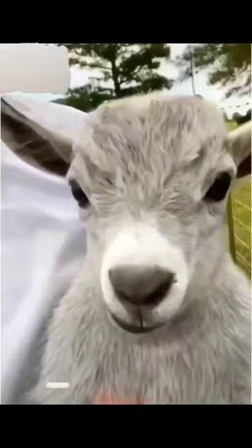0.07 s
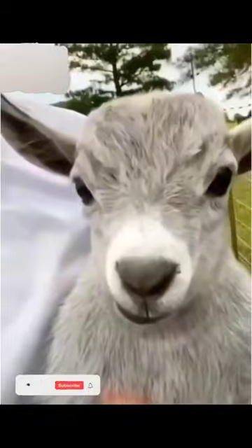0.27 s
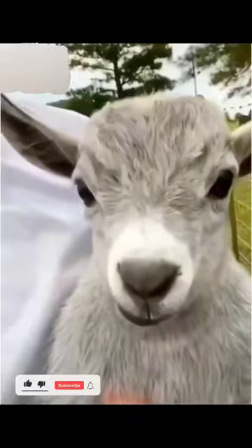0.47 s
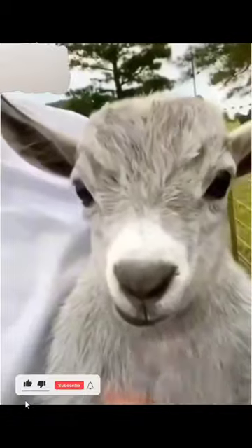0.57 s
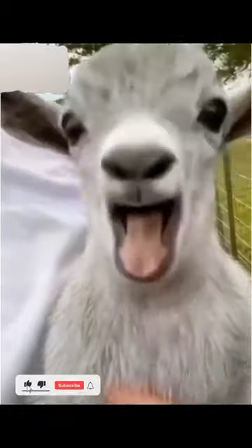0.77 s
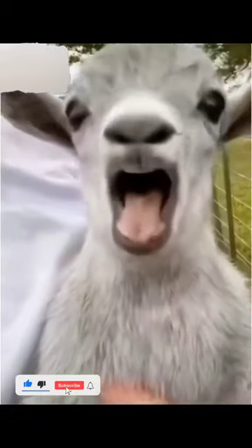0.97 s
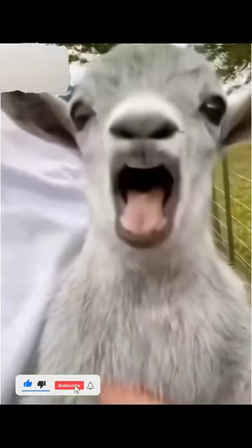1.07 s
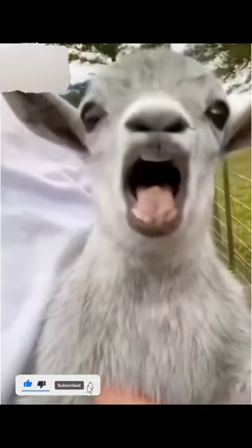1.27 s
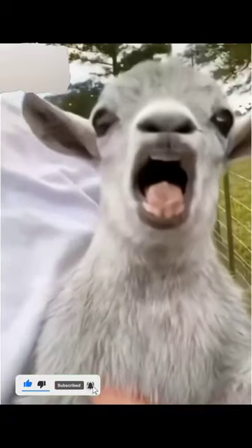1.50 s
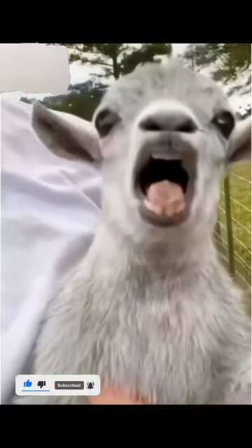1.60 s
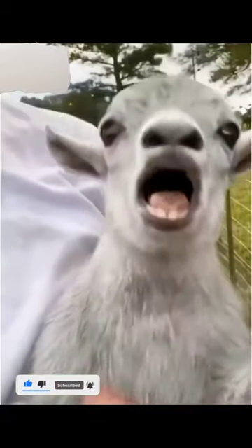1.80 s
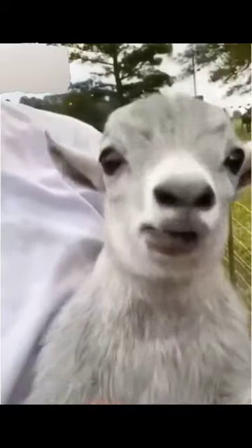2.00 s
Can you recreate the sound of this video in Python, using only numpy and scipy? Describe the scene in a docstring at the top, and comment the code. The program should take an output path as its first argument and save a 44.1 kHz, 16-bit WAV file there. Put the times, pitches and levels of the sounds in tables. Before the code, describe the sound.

A small one-cylinder engine putters from about 0.1 s, roughly eleven thumps a second, with soft clatter and a faint cloth brush near 0.25 s and 0.57 s. At 0.6 s a young goat, very close, bleats: a rasping rise, then a shrill steady note, briefly rough around 1.0-1.2 s, dropping hoarsely by 1.75 s. Afterward only the much fainter engine and slight open-air echo remain.

```python
"""Open air, with trees around: a goat kid, close by, gives one long high bleat over a one-cylinder engine.
The bleat sums harmonics and noise through a changing throat response: a rasping start, a clean held note
that turns rough for a moment as its period triples, and a rasping drop. The engine is a train of decaying
resonances with hiss and clatter; shaped noise makes brushing cloth, throat pops and a faint echo.
The bleat drives the recorder's gain control down, and the engine stays faint from then on."""
import sys
import numpy as np
from scipy import signal
from scipy.fft import rfft, irfft, next_fast_len
from scipy.io import wavfile
from scipy.ndimage import uniform_filter1d, map_coordinates

SR = 44100
rng = np.random.default_rng(int(sys.argv[2]) if len(sys.argv) > 2 else 0)


def materialize(psi):
    """Save the field psi as 16-bit PCM at rate SR to the path in sys.argv[1].

    A 1-D psi becomes a single channel; in a 2-D psi each row is a channel.
    """
    bounded = np.clip(np.atleast_2d(psi).T, -1, 1)
    quanta = np.round(bounded * 32767).astype(np.int16)
    wavfile.write(sys.argv[1], SR, quanta)


N = 90404  # length in samples


def amp(db):
    """Decibel law: a level in dB as an amplitude ratio."""
    return 10 ** (np.asarray(db) / 20)


def unit(x):
    """Normalisation: x scaled to an rms of 1."""
    return x / np.sqrt(np.mean(x ** 2) + 1e-20)


def clock():
    """Sampling: the time of each sample in seconds."""
    return np.arange(N) / SR


def curve(rows):
    """Linear interpolation: (time_s, value) rows as one value per sample."""
    return np.interp(clock(), *np.transpose(rows))


def along(points, hz):
    """Logarithmic frequency scale: (frequency_hz, value) points interpolated at hz."""
    f, v = np.transpose(points)
    return np.interp(np.log(hz + 1), np.log(f), v)


def wobble(rate):
    """Band-limited fluctuation: a smooth random curve with rate knots a second."""
    knots = rng.standard_normal(int(N * rate / SR) + 4)
    return map_coordinates(knots, [clock() * rate])


def filtered(x, response):
    """Linear filtering: the spectrum of x times a response of frequency."""
    m = next_fast_len(N + SR // 2)
    return irfft(rfft(x, m) * response(np.fft.rfftfreq(m, 1 / SR)), m)[:N]


def noise(*spectra):
    """Spectral shaping: white noise coloured by the summed dB spectra, with an rms of 1."""
    white = rng.standard_normal(N)
    return unit(filtered(white, lambda hz: amp(sum(along(s, hz) for s in spectra))))


def decay(age, t60, attack):
    """Exponential decay: a soft start, then a fall of 60 dB in t60 seconds."""
    age = np.maximum(age, 0)
    return 1e-3 ** (age / t60) * (1 - np.exp(-age / attack)) ** 2


# exhaust resonances rung by each cycle: delay_s, frequency_hz, level_db, t60_s, attack_s
EXHAUST_MODES = [(-.0003, 235, -10.5, 0.062, 0.0044), (.0075, 55.8, -20.5, 0.26, 0.0062),
                 (.0165, 98, -12, 0.16, 0.0014), (.012, 394, -30, 0.2, 0.0056)]
# mechanical knocks in each cycle: delay_s, level_db, t60_s
ENGINE_KNOCKS = [(.024, -41.5, 0.099), (.076, -46, .07)]
# response of the engine's casing: frequency_hz, level_db
CASING_RESPONSE = [(60, 4.5), (320, -9), (395, 11.5), (470, -2), (740, -5.5), (1030, -3), (1200, -4),
                   (1310, 3), (1450, -5), (1750, -8), (2100, -1), (2650, -3.5), (3700, -14), (5000, -21.5),
                   (7200, -19.5), (9200, -25)]
# colour of the exhaust hiss: frequency_hz, level_db
HISS_SPECTRUM = [(1000, -20), (3000, -6.5), (5500, -10.5), (7200, 2), (9200, -7.5)]
# colour of the steady low rumble: frequency_hz, level_db
RUMBLE_SPECTRUM = [(20, -11.5), (60, -6.5), (100, -0.5), (150, -18), (250, -15.5), (300, -34.5),
                   (500, -42), (2000, -93)]
FIRST_FIRING_S, CYCLE_S = .1275, .0917
HISS_DELAY_S, HISS_T60_S = 0.014, 0.26
CLATTER_DB, HISS_DB, RUMBLE_DB = -39, -44.5, -36
CLATTER_GRAIN_DB = 3  # random level flutter of the clatter


def engine():
    """Impulse excitation of resonators: each firing rings the exhaust, hisses and knocks the casing."""
    t = clock()
    thump, knock, hiss = np.zeros((3, N))
    for firing_s in np.arange(FIRST_FIRING_S, N / SR, CYCLE_S):
        for delay_s, hz, db, t60, attack in EXHAUST_MODES:
            age = t - firing_s - delay_s
            strength = amp(db + rng.normal(0, 0.63))
            thump += strength * decay(age, t60, attack) * np.sin(2 * np.pi * hz * age)
        for delay_s, db, t60 in ENGINE_KNOCKS:
            knock += amp(db + rng.normal(0, 0.58)) * decay(t - firing_s - delay_s, t60, .002)
        hiss += amp(rng.normal(0, 1.6)) * decay(t - firing_s - HISS_DELAY_S, HISS_T60_S, 0.0014)
    rumble = amp(RUMBLE_DB) * noise(RUMBLE_SPECTRUM)
    grain = amp(CLATTER_GRAIN_DB * wobble(260))
    clatter = (amp(CLATTER_DB) + knock) * grain * noise(CASING_RESPONSE)
    return thump + rumble + clatter + amp(HISS_DB) * hiss * noise(HISS_SPECTRUM)


# cloth brushes as the kid is held: centre_s, level_db, half_length_s
CLOTH_BRUSHES = [(0.26, -33, 0.0057), (.574, -30, 0.012)]
# colour of the rubbing fabric: frequency_hz, level_db
CLOTH_SPECTRUM = [(200, -16), (600, 1), (1000, -4.5), (2500, 5), (4000, -10.5), (9000, -14.5)]


def cloth():
    """Friction noise: brief brushes of fabric as coloured noise under Gaussian envelopes."""
    t = clock()
    envelope = sum(amp(db) * np.exp(-((t - centre_s) / width_s) ** 2)
                   for centre_s, db, width_s in CLOTH_BRUSHES)
    return noise(CLOTH_SPECTRUM) * envelope


# the bleat's fundamental: time_s, pitch_hz
BLEAT_PITCH = [(.6, 588), (.62, 641.8), (.64, 702.3), (.66, 768), (.68, 796.5), (.7, 810.5), (.742, 826.5),
               (.81, 817), (.905, 804.3), (.99, 810.2), (1.24, 810.3), (1.45, 807), (1.52, 801.3),
               (1.56, 804.8), (1.65, 801.8), (1.697, 784), (1.712, 735), (1.73, 603)]
# the bleat's loudness before the gain control: time_s, level_db
BLEAT_EFFORT = [(.596, -40), (.606, -30), (.615, -21), (.622, -8), (.646, -6), (.675, 10.5), (.715, 11),
                (.76, 9), (.81, 11.5), (.95, 12.5), (1.18, 13.5), (1.28, 9), (1.38, 9), (1.5, 7.5),
                (1.63, 9.5), (1.695, 6.5), (1.715, 0), (1.731, -6), (1.741, -17.5), (1.757, -30),
                (1.775, -50)]
# noise in the voice against the tone: time_s, level_db
RASP_LEVEL = [(.6, -1.5), (.626, -3.5), (.645, -6), (.66, -9.5), (.68, -13.5), (.72, -33), (.78, -53.5),
              (.95, -47.5), (1.0, -23.5), (1.14, -24.5), (1.27, -50), (1.64, -50), (1.69, -20.5),
              (1.718, -2), (1.745, 4)]
# the throat's shape (0 mouth half shut, 1 opening, 2 wide open, 3 wide and tiring): time_s, shape
MOUTH_SHAPE = [(.642, 0), (.664, 1.5), (.682, 1), (.73, 2), (1.15, 2), (1.45, 3), (1.7, 3), (1.722, 0)]
# the throat's response: frequency_hz, half_shut_db, opening_db, wide_db, tiring_db
THROAT_RESPONSE = [(450, -36, -44, -43, -60.5), (820, -34, -40.5, -38.5, -39.5),
                   (1220, -25, -37.5, -35, -29), (1535, -8.5, -14, -13, -10), (1924, 6, -6.5, -8, -7),
                   (2427, -6, -13.5, -13, -8.5), (2630, -25, -27, -37.5, -37.5),
                   (3228, -10.5, -13, -11.5, -11), (3590, -11, -13, -20.5, -21), (4037, 1, -0.5, 0.5, 0),
                   (4300, 0, 3, 1.5, 4), (4700, -4, -5, -2, -1), (5810, -13, -2, -3.5, -1.5),
                   (6370, -14, 0.5, -4, 2), (7110, -19, -27, -17.5, -1), (7240, -18.5, -22.5, -16, -13),
                   (8300, -25.5, -31.5, -16, -15.5), (8882, -23.5, -18, -23.5, -17),
                   (9700, -34, -39, -57, -58.5)]
# the rasp's own colour before the throat: frequency_hz, level_db
TURBULENCE_SPECTRUM = [(500, 12.5), (1200, -2), (1900, -2), (2700, -8), (3700, -6.5), (4500, 2.5),
                       (5700, 3), (6600, -4), (8500, 6)]
WAVER, JITTER = 0.00049, 0.0014  # slow and quick pitch scatter, as fractions of the pitch
JITTER_RASP = 0.0456  # further pitch scatter as the rasp grows
SHIMMER_DB, FLUTTER_DB = 0.2234, 0.16  # slow and quick level drift, per harmonic number
TRIPLE_START_S, TRIPLE_END_S = 0.98, 1.185
TRIPLE_RISE_S, TRIPLE_FALL_S = 0.026, 0.13  # time for each 20 dB of rise or fall
TRIPLE_DB, TRIPLE_SWAY_DB = -23, 2.5  # level of the roughness, and its coming and going
SHUDDER_DB, SHUDDER_RATE = 2.5, 240  # uneven bursts of the rasping voice, in dB and knots a second


def goat():
    """Source-filter principle: fold harmonics, period tripling and rasp through a changing throat."""
    t, pitch = clock(), curve(BLEAT_PITCH)
    rasp, mouth = amp(curve(RASP_LEVEL)), curve(MOUTH_SHAPE)
    rasp_share = np.minimum(rasp, 1)
    scatter = WAVER * wobble(25) + JITTER * wobble(70) + JITTER_RASP * rasp_share * wobble(600)
    phase = 2 * np.pi * np.cumsum(pitch * (1 + scatter)) / SR

    # neighbouring throat shapes are crossfaded in dB
    frequency_hz, *columns = np.transpose(THROAT_RESPONSE)
    shapes = [list(zip(frequency_hz, column)) for column in columns]
    shares = [np.maximum(1 - abs(mouth - i), 0) for i in range(len(shapes))]

    def throat(hz):
        """Vocal tract resonance: the throat's gain at a moving frequency."""
        return amp(sum(share * along(shape, hz) for share, shape in zip(shares, shapes)))

    tone, power, tripled = 0, 0, 0
    for k in range(1, 16):
        drift_db = k * (SHIMMER_DB * wobble(14) + FLUTTER_DB * wobble(70))
        gain = throat(k * pitch) * amp(drift_db)
        tone = tone + gain * np.cos(k * phase - .12 * k * k)
        power = power + gain ** 2 / 2

    # a tripled period adds partials at the thirds between harmonics
    for third in range(4, 35):
        if third % 3:
            k = third / 3
            gain = throat(k * pitch) * amp(2.5 * wobble(14))
            tripled = tripled + gain * np.cos(k * phase + .45 * wobble(55))
    before = np.maximum(TRIPLE_START_S - t, 0) / TRIPLE_RISE_S
    after = np.maximum(t - TRIPLE_END_S, 0) / TRIPLE_FALL_S
    triple_db = TRIPLE_DB - 20 * (before + after) + TRIPLE_SWAY_DB * wobble(25)
    voiced = (tone + amp(triple_db) * tripled) / np.sqrt(power)

    # turbulent air pulses with the vocal folds
    air = sum(share * noise(shape, TURBULENCE_SPECTRUM) for share, shape in zip(shares, shapes))
    air = air * (1 + .45 * np.cos(phase)) * amp(3.2 * wobble(170))
    voice = (voiced + rasp * air) / np.sqrt(1 + rasp ** 2)
    shudder = amp(SHUDDER_DB * rasp_share * wobble(SHUDDER_RATE))
    sounding = (t > BLEAT_EFFORT[0][0]) * (t < BLEAT_EFFORT[-1][0])
    return shudder * amp(curve(BLEAT_EFFORT)) * sounding * voice


# the glottis pops as it catches and lets go, before the gain control: start_s, level_db
GLOTTAL_POPS = [(0.607, -11), (1.7487, -19)]
POP_HZ, POP_T60_S = 4820, .022


def pops():
    """Transient excitation of a resonance: short puffs of noise peaked around one throat frequency."""
    white = rng.standard_normal(N)
    ring = unit(filtered(white, lambda hz: 1 / (1 + ((hz - POP_HZ) / 350) ** 2)))
    return ring * sum(amp(db) * decay(clock() - start_s, POP_T60_S, 0.00038)
                      for start_s, db in GLOTTAL_POPS)


ECHO_DB, ECHO_T60_S = -49.5, .7


def trees(bleat):
    """Diffuse reverberation: the trees answer faintly, as convolution with decaying noise."""
    tail = rng.standard_normal(N) * decay(clock(), ECHO_T60_S, .02)
    echo = signal.fftconvolve(bleat, tail / np.linalg.norm(tail))[:N]
    return amp(ECHO_DB) * echo


def scene():
    """Superposition: the engine, cloth, bleat and echo add in the open air."""
    bleat = goat() + pops()
    return (engine() + cloth() + bleat + trees(bleat))[None]


OPEN_S, FADE_S = .057, 0.028  # the microphone fades in
LIMIT_DB, ATTACK_S, CREEP_DB_PER_S = -13.5, 0.0058, 4  # gain control
CLIP_LEVEL = .88  # soft saturation, as amplitude
LOW_CUT_HZ, TOP_HZ = 15, 9400


def record(dry):
    """Gain compression without release: loud sound cuts the gain, which creeps lower and stays down."""
    x = dry[0] * np.clip((clock() - OPEN_S) / FADE_S, 0, 1)
    power = abs(uniform_filter1d(x * x, size=700))
    over_db = np.maximum(10 * np.log10(power + 1e-12) - LIMIT_DB, 0)
    creep_db = CREEP_DB_PER_S * np.cumsum(over_db > 0) / SR
    wanted_db = np.maximum.accumulate(over_db) + creep_db
    pole = np.exp(-1 / (ATTACK_S * SR))
    cut_db = signal.lfilter([1 - pole], [1, -pole], wanted_db)
    x = x * amp(-cut_db)
    x = x / (1 + (x / CLIP_LEVEL) ** 10) ** (1 / 10)

    def band(hz):
        """Band limiting: a gentle low cut and a very steep top."""
        return hz ** 3 / (hz ** 3 + LOW_CUT_HZ ** 3) / (1 + (hz / TOP_HZ) ** 70)

    return filtered(x, band)[None]


dry = scene()
out = record(dry)
materialize(out)
```